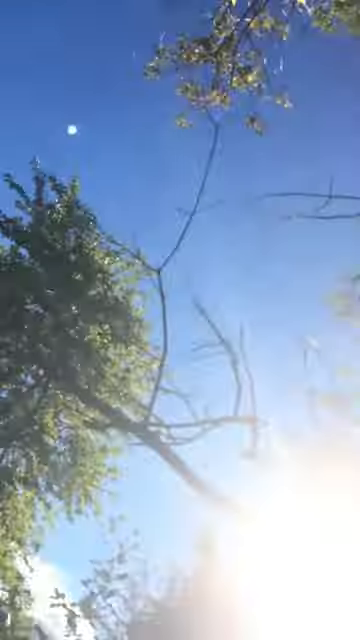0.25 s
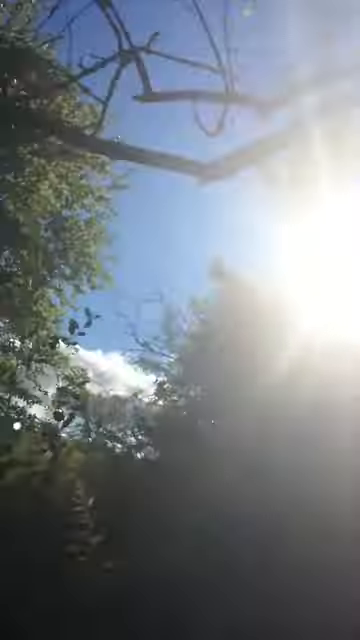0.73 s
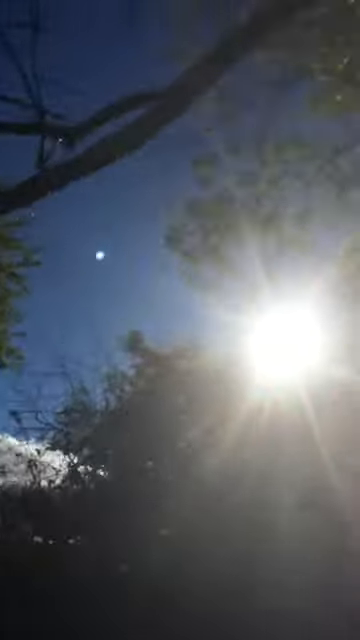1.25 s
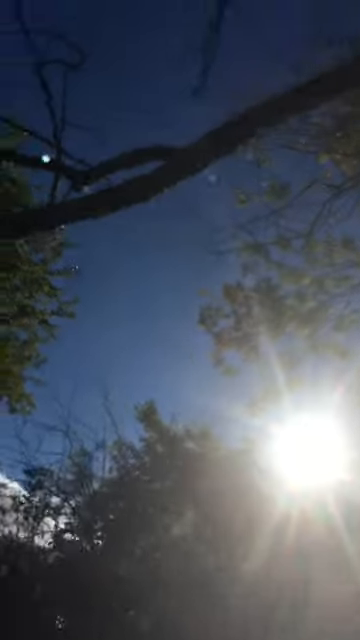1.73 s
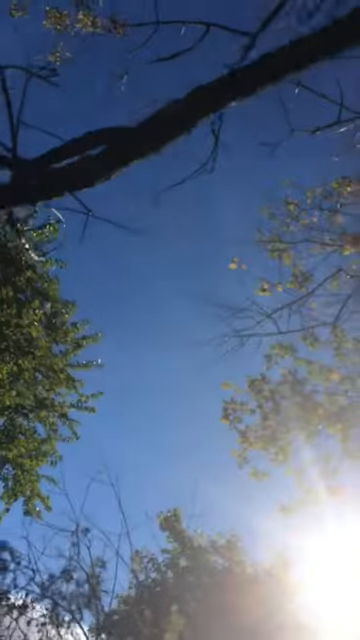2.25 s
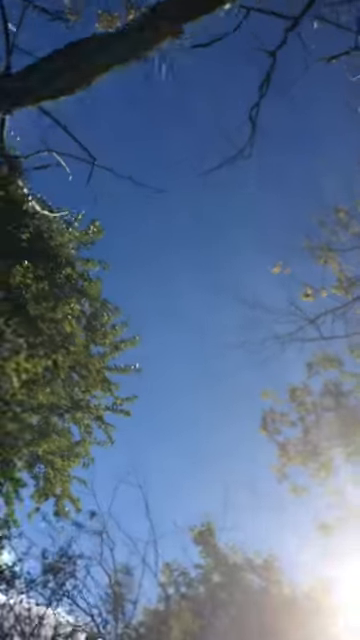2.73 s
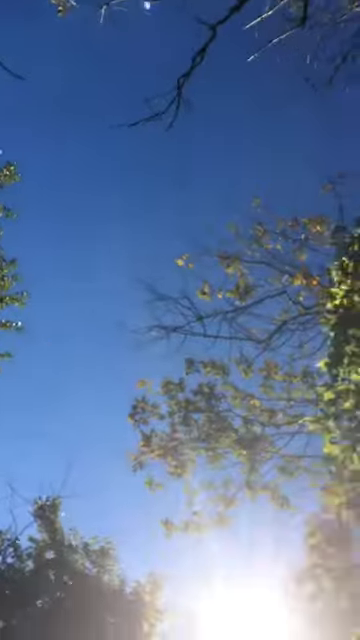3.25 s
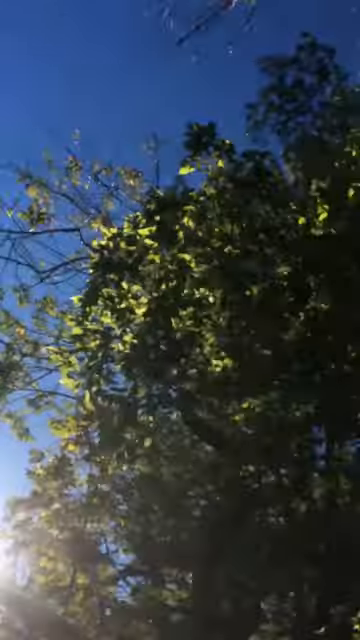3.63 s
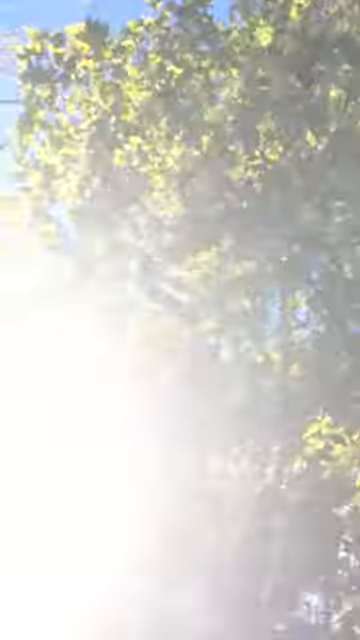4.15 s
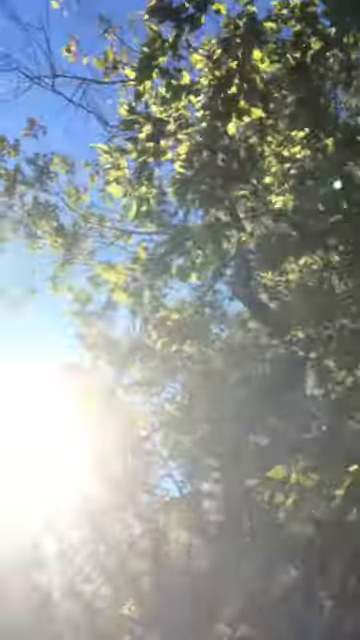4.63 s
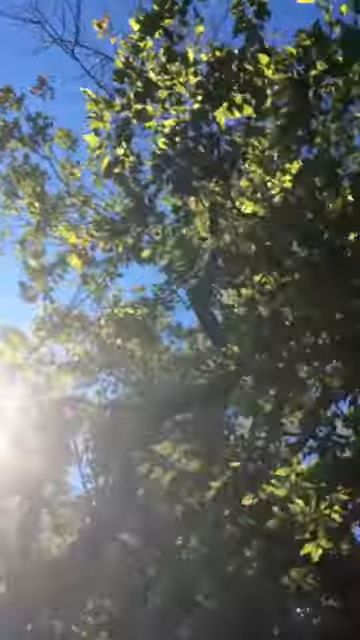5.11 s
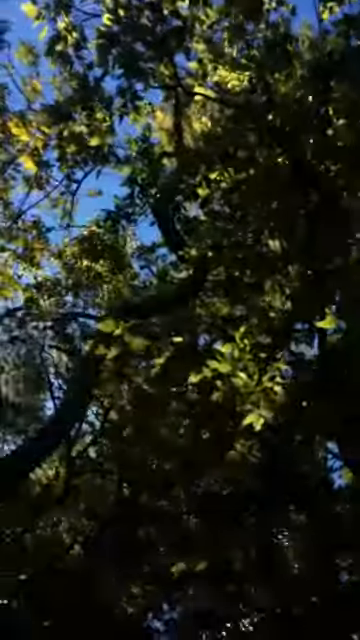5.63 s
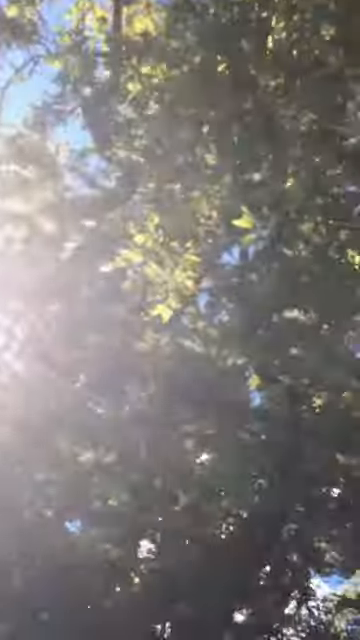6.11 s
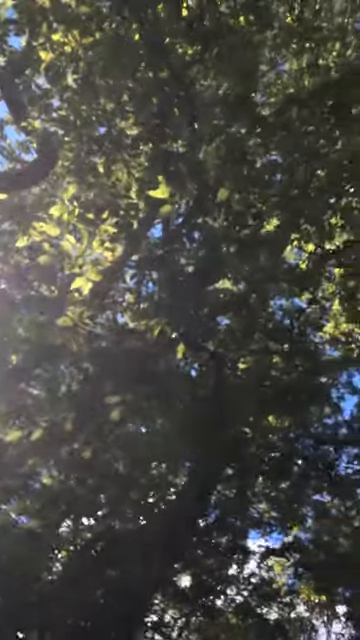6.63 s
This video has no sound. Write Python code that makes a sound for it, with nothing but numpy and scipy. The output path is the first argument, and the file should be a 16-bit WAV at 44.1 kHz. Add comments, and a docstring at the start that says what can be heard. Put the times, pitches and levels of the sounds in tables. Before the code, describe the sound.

In quiet woods, dry leaves rustle softly in short pushes as a person moves. A few small ticks lead to one loud, crisp twig snap nearby, followed by lighter cracks and more rustling that slowly calms, with another quick cluster of ticks late on. The hand-held microphone picks up soft grip knocks and dull bumps. Behind it all lie a faint airy rumble, high distant insects and a barely audible hoarse bird.

```python
"""Shifting about in dry leaves.

Someone moves under trees, turning a hand-held camera. Leaf slips on leaf in swishes and crackles, a twig snaps
close by, and fingers tap the hollow case with sharp clicks and soft knocks. Insect wings trill far off, a
distant bird gives a falling cry, and the open air rumbles faintly."""
import sys
import numpy as np
from scipy import signal
from scipy.fft import rfft, irfft, next_fast_len
from scipy.io import wavfile
from scipy.ndimage import uniform_filter1d

SR = 44100
rng = np.random.default_rng(int(sys.argv[2]) if len(sys.argv) > 2 else 0)


def persist_wave(psi):
    """Save psi, clipped to +-1, as 16-bit WAV."""
    counts = np.round(np.clip(psi, -1, 1) * 32767).astype(np.int16)
    wavfile.write(sys.argv[1], SR, np.atleast_2d(counts).T)


N = 303097
TIME_S, FREQ_HZ = np.arange(N) / SR, np.fft.rfftfreq(N, 1 / SR)
IMPULSE_SAMPLES = 2048
IMPULSE_FREQ_HZ = np.fft.rfftfreq(IMPULSE_SAMPLES, 1 / SR)

# Still air. Each row: frequency in Hz, relative level in dB.
AIR_SPECTRUM = [(15, -34), (35, -13), (78, 0.5), (115, -5.5), (190, -5), (300, -12), (440, -8.5),
                (800, -15), (1250, -17), (2700, -19.5), (5000, -25.5), (8700, -23), (15300, -29)]
# Insect bands. Each row: centre in Hz, spread in Hz, level in dB, trills per second.
CHORUSES = [(7213, 65, -70.5, 59), (7010, 34, -70, 106), (6675, 270, -69, 38), (5060, 300, -71.5, 16),
            (7940, 410, -74.5, 41)]
# High lisp of the smallest insects. Each row: time in seconds, gain in dB.
LISP_ENVELOPE = [(0, -61.5), (.4, -63.5), (1.4, -79), (2.5, -74.5), (3.5, -68), (5.2, -66.5), (5.9, -83),
                 (6.3, -80), (6.6, -69.5), (6.87, -70)]
# Bird glides. Each row: start and length in seconds, first and last pitch in Hz, level in dB,
# hoarseness (capped at 1).
BIRD_NOTES = [(3.6, .09, 2570, 2430, -67, 0.9), (4.6, .17, 2550, 1850, -66, 0.92),
              (4.77, .21, 2290, 2115, -72, .7), (4.931, 0.2, 1964, 1860, -63, 0.26),
              (5.1, .23, 1870, 1818, -64, 0.4), (5.191, .14, 2090, 2120, -63.5, .55),
              (5.281, .14, 1750, 1713, -68, 0.5), (5.3, .22, 2330, 2250, -63, .85),
              (5.405, .12, 1905, 1890, -64, .4), (6.231, 0.066, 2450, 2150, -67, 1.1)]
# Fingers on the case. Each row: time in seconds, envelope peak in dB, pitch in Hz.
GRIP_KNOCKS = [(0.395, -46, 455), (0.523, -50, 578), (0.75, -41.5, 445), (1.364, -28, 457),
               (1.384, -42, 406), (1.559, -46, 400), (2.129, -34, 427), (2.715, -50, 554),
               (4.731, -50, 425), (5.336, -41, 444), (5.414, -47, 440), (5.848, -48.5, 417),
               (5.904, -45, 463), (6.703, -49.5, 441)]
# Dull bumps of the hand. Each row: start in seconds, envelope peak in dB, pitch in Hz.
HAND_BUMPS = [(1.025, -42, 154), (1.36, -47, 85), (2.126, -46, 110), (2.155, -53, 65), (4.3, -53.5, 72),
              (5.761, -51, 98), (6.715, -52, 89)]
# Sharp clicks of fingers tapping the case. Each row: start in seconds, strength, low tilt and high tilt in dB,
# T60 in seconds.
TAP_CLICKS = [(.3485, -30, -11, 0, .008), (.4526, -24, -0.5, 3, 0.0094), (.5257, -23.5, 8.5, 12, 0.0095),
              (.7489, -29.5, 10, -4, 0.0083), (.902, -32.5, -8, 4, .01),
              (1.3586, -15.5, -8.5, 2.5, 0.043), (1.554, -25, -9, -5, .014), (1.699, -33.5, 3, -5, .015),
              (2.1262, -14, 0.5, -5.5, .026), (2.203, -32.5, -4, 2, .013),
              (2.8567, -34.5, -3.5, -4, .017), (2.978, -33.5, -6, 0, .022), (4.0488, -38, -4, -5, .013),
              (5.3305, -25.5, 14, -1, 0.0088), (5.399, -25.5, -20, 5, .007),
              (5.4088, -13.5, -7.5, -5, 0.0078)]
# Hard clicks. Each row: frequency in Hz, relative level in dB.
CLICK_SPECTRUM = [(60, -17), (190, 2), (300, -18), (520, 3), (760, 4), (950, 1), (1250, -8.5), (1800, -6),
                  (2400, -1.5), (3100, -3), (4200, -6), (5250, 4.5), (6000, -14), (8300, -7), (15000, -28)]
# Resonances of the close twig. Each row: centre in Hz, width in Hz, relative level in dB.
TWIG_MODES = [(204, 92, -5), (543, 79, -11.5), (1100, 120, -11), (1463, 140, -1), (3680, 410, 3.5),
              (4460, 760, -3), (7740, 870, -6)]
# The snap scattered back. Each row: frequency in Hz, relative level in dB.
SCATTER_SPECTRUM = [(80, -25), (190, 7.5), (750, -4.5), (1350, 4.5), (1900, -4), (2800, -1), (3250, 5),
                    (4300, 1.5), (6500, 7.5), (7600, 9.5), (9000, 1), (15000, -10)]
# Dry leaves. Each row: frequency in Hz, relative level in dB.
LEAF_SPECTRUM = [(150, -21), (300, -5), (450, -6), (800, -8), (1200, -6.5), (1750, -7), (2250, -4),
                 (2850, -8), (3120, 2.5), (4400, -.5), (5800, -2.5), (7200, -4.5), (8300, -11),
                 (15300, -17)]
# Pushes through the leaves. Each row: time of full force in seconds, hold in seconds, gain in dB,
# body and fizz offsets in dB.
LEAF_PUSHES = [(.34, 0.21, -56.5, -11, -4.5), (0.661, 0.042, -57.5, -10, 1), (.81, 0.084, -63, -10.5, 0),
               (1.044, 0.053, -47, -8, -2.5), (1.162, 0.087, -49, -9.5, -6), (1.346, 0.018, -51.5, -9, -7),
               (1.528, 0.017, -50.5, -14, -10.5), (1.76, 0.014, -55, -11.5, -10),
               (1.877, 0.11, -63, -5.5, -5), (2.05, 0.13, -56, -10.5, -6.5), (2.215, .12, -64, -7, -3.5),
               (2.736, 0.066, -51.5, -9.5, -7), (2.86, 0.1, -50.5, -11, -6), (3.045, 0.027, -64, -5, -1),
               (3.177, .03, -63, -4.5, 0), (3.297, 0.31, -77, 5, 2), (3.62, .015, -65, -5, -4),
               (3.97, .03, -68, -6, -5), (4.04, .04, -59.5, -3.5, -6), (4.128, 0.085, -56, -8.5, -8),
               (4.275, 0.23, -61, -4.5, -3), (4.978, .04, -68.5, -7, 2), (5.075, 0.15, -59, -9, -3.5),
               (5.29, 0.18, -60.5, -8, -12), (5.52, 0.12, -59.5, -10.5, -1.5),
               (5.703, 0.078, -59.5, -10, -5), (5.89, .03, -67, 0.5, -3), (6.0, .05, -75, 8, -10),
               (6.19, .05, -78.5, 5, -5), (6.465, 0.031, -59, -9, -1)]


def from_db(db):
    return 10 ** (np.asarray(db) / 20)


def unit_rms(x):
    return x / np.sqrt(np.mean(x ** 2) + 1e-30)


def decay(t_s, t60_s, start_db=0):
    return from_db(start_db - 60 * t_s / t60_s)


def curve_db(points, at_hz=FREQ_HZ):
    """Spectrum interpolated on a log frequency axis."""
    hz, db = np.transpose(points)
    return np.interp(np.log(at_hz + 1), np.log(hz + 1), db)


def add(mix, start_s, sound):
    part = mix[max(round(start_s * SR), 0):][:len(sound)]
    part += sound[:len(part)]


def filtered(x, response):
    return irfft(rfft(x) * response, N)


def lowpass(cutoff_hz):
    return 1 / (1 + (FREQ_HZ / cutoff_hz) ** 10)


def coloured_noise(spectrum):
    return filtered(rng.standard_normal(N), from_db(curve_db(spectrum)))


def band_noise(centre_hz, spread_hz):
    bell = np.exp(-.5 * ((FREQ_HZ - centre_hz) / spread_hz) ** 2)
    return unit_rms(filtered(rng.standard_normal(N), bell))


def drift(rate_hz):
    """Smooth random wander, rms 1."""
    size = next_fast_len(N, real=True)
    rolloff = np.exp(-(np.fft.rfftfreq(size, 1 / SR) / rate_hz) ** 2)
    return unit_rms(irfft(rfft(rng.standard_normal(size)) * rolloff, size)[:N])


def sharp_impulse(spectrum_db):
    """Minimum-phase impulse with this spectrum."""
    cepstrum = irfft(np.log(from_db(spectrum_db)))
    cepstrum[1:IMPULSE_SAMPLES // 2] *= 2
    cepstrum[IMPULSE_SAMPLES // 2 + 1:] = 0
    return irfft(np.exp(rfft(cepstrum)))


def dappled(x, depth_db):
    """Brief random patches of colour, a few hundred Hz wide."""
    frames = signal.stft(x, nperseg=512, noverlap=384)[2]
    patches = uniform_filter1d(rng.standard_normal(frames.shape), size=3, axis=0)
    patches = unit_rms(uniform_filter1d(patches, size=9, axis=1))
    return signal.istft(frames * from_db(depth_db * patches), nperseg=512, noverlap=384)[1][:N]


def air(rumble_db=-63, hiss_db=-69, lumps_db=2.7):
    """Lumpy low rumble under the even hush of the woods."""
    noise = coloured_noise(AIR_SPECTRUM)
    rumble = filtered(noise, lowpass(390)) * from_db(lumps_db * drift(8.5))
    hiss = dappled(filtered(noise, 1 - lowpass(412)), depth_db=2.9)
    return from_db(rumble_db) * unit_rms(rumble) + from_db(hiss_db) * unit_rms(hiss)


def insects(trill_depth=0.22, swell_db=1.0, skirt_db=-1):
    """Many far wings blur into narrow throbbing bands; a high lisp comes and goes above."""
    out = np.zeros(N)
    for centre_hz, spread_hz, db, trill_hz in CHORUSES:
        rate_hz = trill_hz * (1 + 0.147 * drift(3.9))
        throb = 1 + trill_depth * np.sin(2 * np.pi * np.cumsum(rate_hz) / SR)
        out += band_noise(centre_hz, spread_hz) * throb * from_db(db + swell_db * drift(4.2))
    lisp = band_noise(10350, 1100) + from_db(skirt_db) * band_noise(11100, 3800)
    lisp_db = np.interp(TIME_S, *np.transpose(LISP_ENVELOPE))
    return out + lisp * from_db(lisp_db)


def bird(rasp_hz=120, flutter_db=2.5, waver_hz=14, echo_t60_s=0.41, echo_gain=0.63):
    """Thin cries blurred by the trees; the hoarser a note, the wider its pitch smears."""
    out = np.zeros(N)
    flutter = from_db(flutter_db * drift(25))
    detune_hz = waver_hz * drift(22)
    for start_s, length_s, first_hz, last_hz, db, hoarse in BIRD_NOTES:
        on = (TIME_S > start_s) & (TIME_S < start_s + length_s)
        hoarse = min(hoarse, 1)
        smear_hz = rasp_hz * (1 + 2 * hoarse ** 2)
        rasp = (drift(smear_hz) + 1j * drift(smear_hz))[on] / np.sqrt(2)
        pitch_hz = np.linspace(first_hz, last_hz, on.sum()) + detune_hz[on]
        carrier = np.exp(2j * np.pi * np.cumsum(pitch_hz) / SR)
        cry = (carrier * (np.sqrt(1 - hoarse ** 2) + hoarse * rasp)).real
        out[on] += from_db(db) * cry * flutter[on] * signal.windows.tukey(on.sum(), alpha=0.45)
    trees = rng.standard_normal(SR // 2) * decay(TIME_S[:SR // 2], echo_t60_s)
    return out + echo_gain * signal.fftconvolve(out, trees / np.linalg.norm(trees))[:N]


def thud(pitch_hz, rise_s):
    """A soft contact swells and dies in a few cycles."""
    t_s = TIME_S[:SR // 6]
    envelope = (t_s / rise_s * np.exp(1 - t_s / rise_s)) ** 2
    return envelope * np.sin(2 * np.pi * pitch_hz * t_s)


def handling(knock_lead_s=0.0019):
    """Fingers knock the hollow case and bump its whole mass."""
    out = np.zeros(N)
    for at_s, db, pitch_hz in GRIP_KNOCKS:
        add(out, at_s - knock_lead_s, from_db(db) * thud(pitch_hz, rise_s=0.0041))
    for start_s, db, pitch_hz in HAND_BUMPS:
        add(out, start_s, from_db(db) * thud(pitch_hz, rise_s=0.01))
    return out


def tap_clicks(rattle_gain=0.18):
    """A sharp first click and a short rattle after it, coloured by the hard case."""
    t_s, out = TIME_S[:SR // 5], np.zeros(N)
    for start_s, db, low_db, high_db, t60_s in TAP_CLICKS:
        tilt_db = curve_db([(950, low_db), (2200, 0), (5000, 0), (8500, high_db)], IMPULSE_FREQ_HZ)
        tap = sharp_impulse(curve_db(CLICK_SPECTRUM, IMPULSE_FREQ_HZ) + tilt_db)
        fade = decay(t_s, t60_s) + decay(t_s, t60_s=0.11, start_db=-27)
        force = rattle_gain * rng.standard_normal(len(t_s)) * fade
        force[0] = 1  # first click
        add(out, start_s, from_db(db) * signal.fftconvolve(force, tap / np.linalg.norm(tap)))
    return out


def twig_snap(start_s=1.2246, first_peak_db=-3.5, second_offset_db=-8, gap_s=0.0009):
    """Two quick breaks; splinters follow, and ground and trunks scatter the sound back."""
    t_s, out = TIME_S[:SR // 2], np.zeros(N)
    mode_power = sum(from_db(db) ** 2 / (1 + ((IMPULSE_FREQ_HZ - centre_hz) / width_hz) ** 2) ** 2
                     for centre_hz, width_hz, db in TWIG_MODES)
    ring = sharp_impulse(10 * np.log10(mode_power + 1e-8))
    ring = -from_db(first_peak_db) * ring / abs(ring).max()
    scatter = unit_rms(coloured_noise(SCATTER_SPECTRUM))[:len(t_s)]
    splinter_fade = decay(t_s, t60_s=0.046, start_db=-22)
    echo_fade = decay(t_s, t60_s=0.27, start_db=-34)
    add(out, start_s, ring)
    add(out, start_s + gap_s, from_db(second_offset_db) * ring)
    add(out, start_s, scatter * np.hypot(splinter_fade, echo_fade))
    return out


def push(full_s, hold_s, gather_s=0.036, ease_db_per_s=7, settle_s=0.038):
    """Envelope of one push: force gathers, eases while held, and the leaves spring back."""
    early = np.maximum(full_s - TIME_S, 0) / gather_s
    late = np.maximum(TIME_S - full_s - hold_s, 0) / settle_s
    held_s = np.clip(TIME_S - full_s, 0, hold_s)
    return from_db(-ease_db_per_s * held_s) / (1 + early ** 2 + late ** 2)


def rustle_envelopes(stir_db=-65.5, stir_body_db=-4, stir_fizz_db=-2.5, calm_db_per_s=1.57):
    """Body, middle and fizz gains: pushes add in power to a slowly calming stir."""
    moves = [(from_db(-calm_db_per_s * TIME_S), stir_db, stir_body_db, stir_fizz_db)]
    moves += [(push(full_s, hold_s), *gains_db) for full_s, hold_s, *gains_db in LEAF_PUSHES]
    power = sum(np.outer(from_db([db + body_db, db, db + fizz_db]), envelope) ** 2
                for envelope, db, body_db, fizz_db in moves)
    return np.sqrt(power)


def leaves(slips_per_s=6000, brush_gain=1.19, flutter_db=0.84, clump_db=0.5):
    """Countless tiny slips of leaf on leaf, in clumps, over a smooth brushing hiss."""
    body, middle, fizz = rustle_envelopes()
    sizes = from_db(3 * np.minimum(rng.exponential(1, N), 4))
    slips = sizes * rng.choice([-1, 1], N) * (rng.random(N) < slips_per_s / SR)
    friction = unit_rms(slips) + brush_gain * rng.standard_normal(N)
    friction *= from_db(flutter_db * drift(78) + clump_db * drift(18))
    rustle = filtered(dappled(friction, depth_db=2.5), from_db(curve_db(LEAF_SPECTRUM)))
    bands = [(lowpass(1900), 700, 1700, body),  # whole leaves
             (lowpass(7500) - lowpass(1900), 3000, 6200, middle * from_db(-0.36)),  # edges
             (1 - lowpass(7500), 8000, 15000, fizz * from_db(0.43))]  # finest slips
    out = np.zeros(N)
    for response, core_low_hz, core_high_hz, envelope in bands:
        core = filtered(rustle, (FREQ_HZ > core_low_hz) & (FREQ_HZ < core_high_hz))
        out += filtered(rustle, response) / np.std(core) * envelope
    return out


def scene():
    """All sources at one microphone."""
    return (leaves() + air() + insects() + twig_snap() + tap_clicks() + handling() + bird())[None]


def record(dry, cutoff_hz=15380):
    """The recorder's band limit."""
    taps = signal.firwin(511, cutoff_hz, window=("kaiser", 9), fs=SR)
    return signal.oaconvolve(dry, taps[None], "same")


dry = scene()
out = record(dry)
persist_wave(out)
```